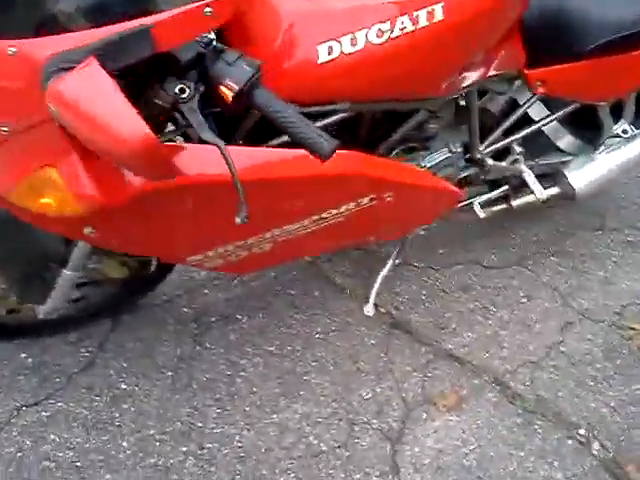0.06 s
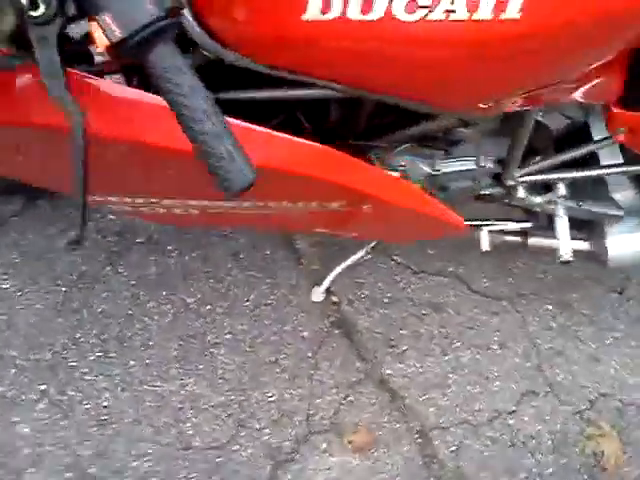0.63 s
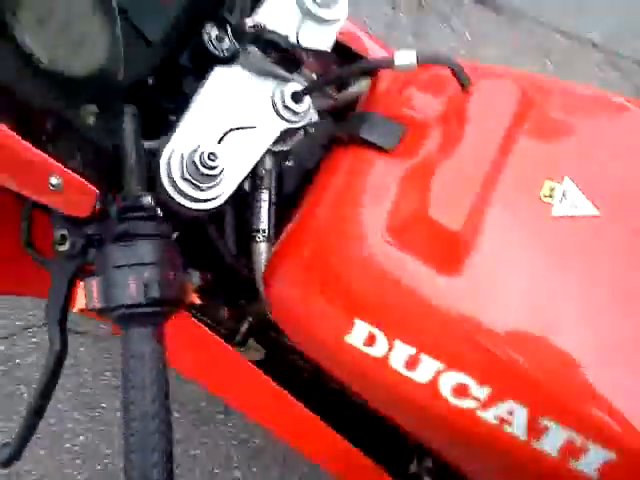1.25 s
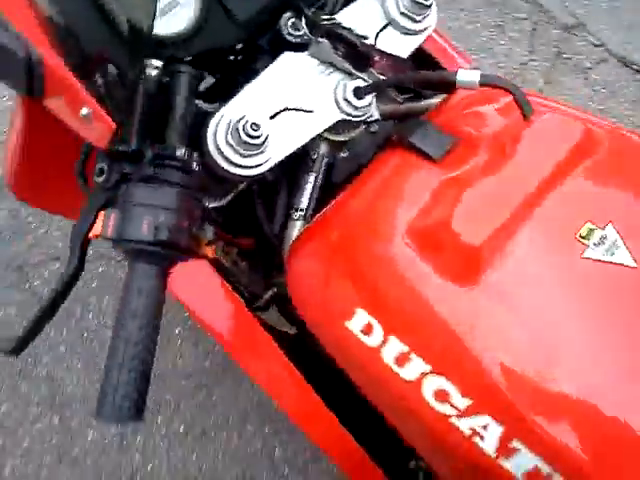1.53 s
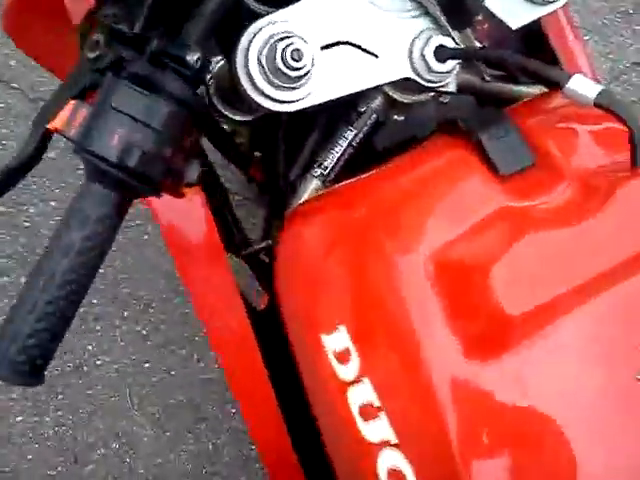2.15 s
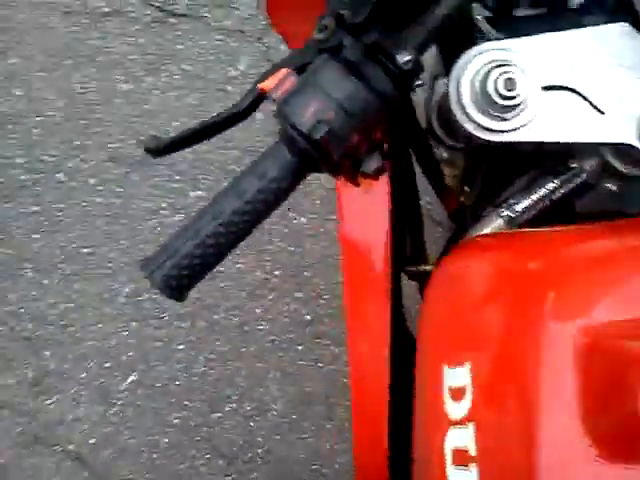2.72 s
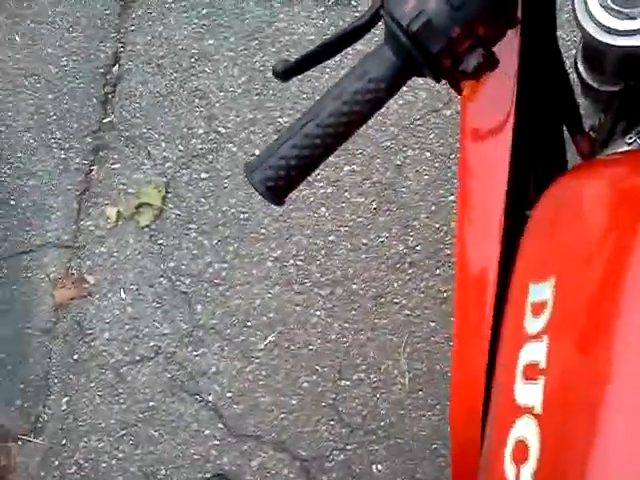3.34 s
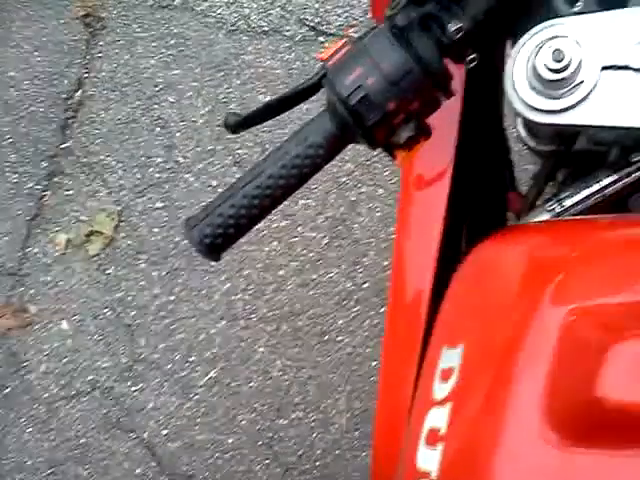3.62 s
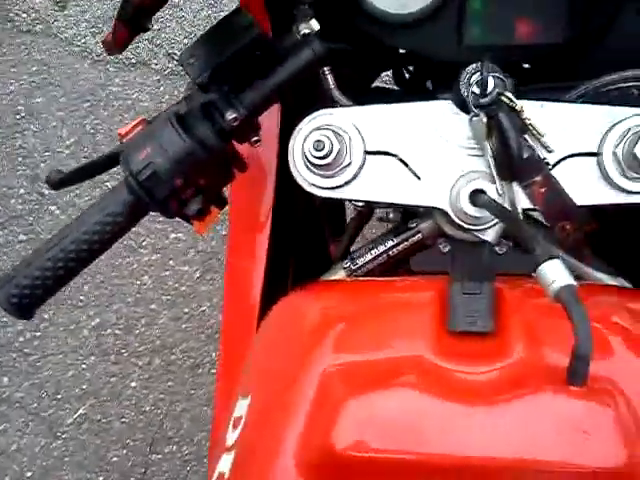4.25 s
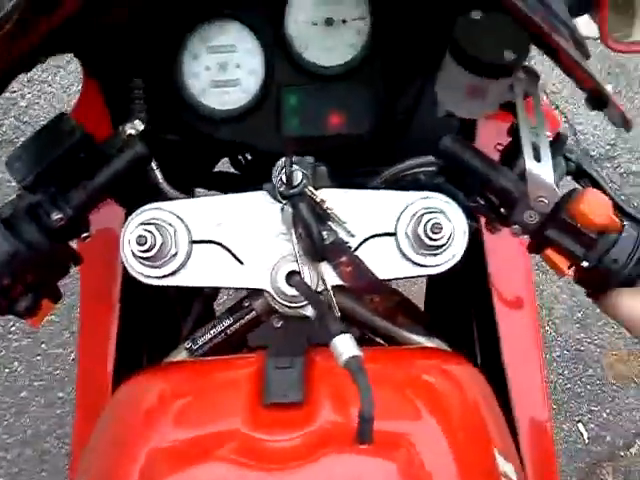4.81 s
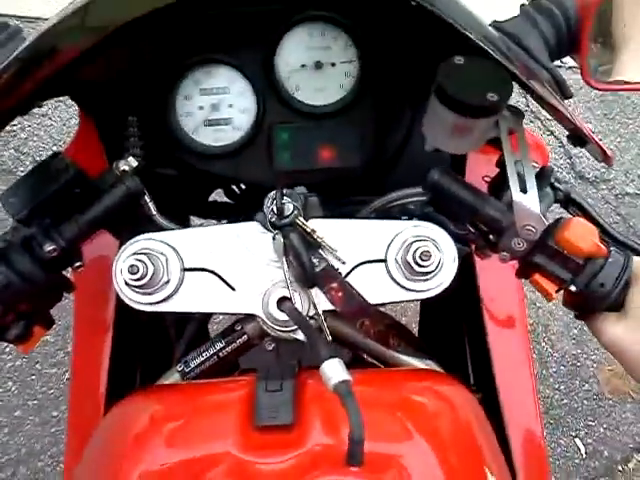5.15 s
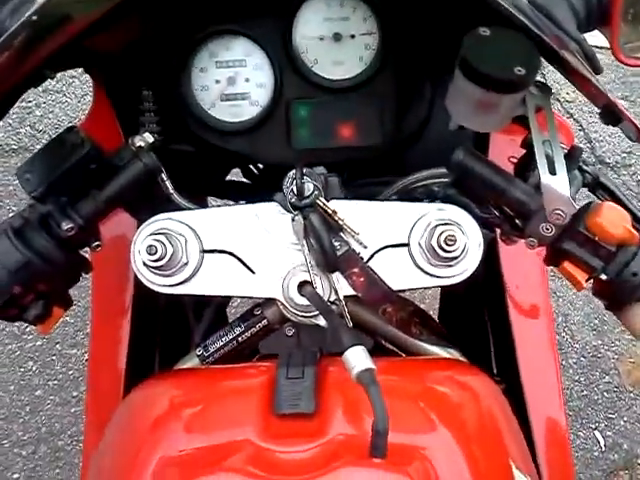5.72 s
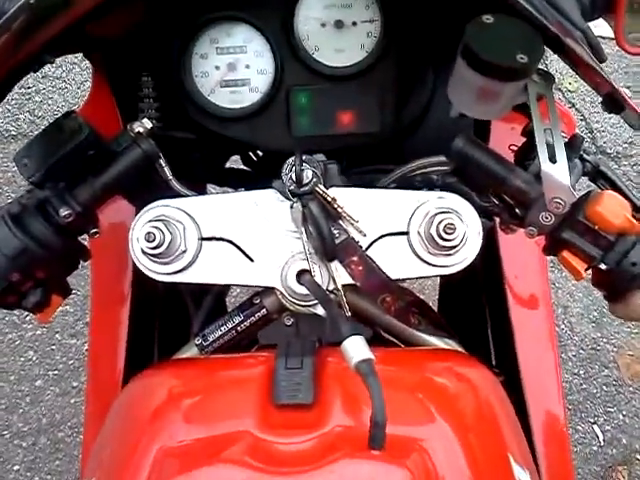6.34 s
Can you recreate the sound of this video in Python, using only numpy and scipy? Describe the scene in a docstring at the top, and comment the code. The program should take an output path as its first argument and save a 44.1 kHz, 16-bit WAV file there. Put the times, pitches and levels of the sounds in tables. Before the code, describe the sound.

Heard close up on a small hand-held microphone outdoors, a motorcycle engine idles unevenly in paired thumps while its clutch and valve gear rattle. The exhaust bark grows a little stronger as the microphone nears the handlebar. Then come two quick revs, a short drop in speed, and two more. Each starts with a crack and opens into a boom, the second and fourth climbing highest, with slight clipping and faint hiss on the peaks.

```python
"""V-twin motorcycle, idle and four blips

Close up in a driveway: a slow, loping double beat, then the throttle is blipped four times.
Every firing barks in the pipes and, under throttle, booms in the airbox; clutch and valve gear clatter
all along. A small hand-held microphone moves from the engine's side to the handlebar.
The loudest revs are flattened and carry a faint high hiss."""
import sys
import numpy as np
from scipy import signal
from scipy.fft import rfft, irfft, next_fast_len
from scipy.io import wavfile
from scipy.ndimage import uniform_filter1d

SR = 44100
rng = np.random.default_rng(int(sys.argv[2]) if len(sys.argv) > 2 else 0)


def output_pcm(signal):
    """Save a mono or channel-first signal as 16-bit PCM at the path in sys.argv[1].

    Samples are clipped to [-1, 1] before scaling.
    """
    pcm = np.clip(np.atleast_2d(signal).T, -1, 1) * 32767
    wavfile.write(sys.argv[1], SR, np.round(pcm).astype(np.int16))


N = 285327
TIME = np.arange(N) / SR
AGE = np.arange(SR // 8) / SR   # seconds since a firing

# exhaust resonances, hollow and upper at idle, open under throttle: (frequency [Hz], level [dB])
PIPE_HOLLOW = [(587, 1.5)]
PIPE_UPPER = [(755, -1), (935, -2.5)]
PIPE_OPEN = [(578, -2), (775, -1.5), (950, -12)]
# airbox resonances: (frequency [Hz], level [dB])
AIRBOX_MODES = [(294.2, -1), (378.7, -13), (260, -21)]
# ringing of the covers and fins, and of the clutch plates: (frequency [Hz], level [dB], t60 [s])
COVER_MODES = [(885, -6, 0.01), (1003, -12, 0.13), (1122, -6, 0.055), (1305, -3, 0.046),
               (1580, -5.5, 0.077), (1810, -7.5, 0.03), (2080, -9.5, 0.04), (2239, -1.5, 0.044),
               (2596, -4, 0.03), (2742, -8.5, 0.013), (3270, -12.5, 0.024)]
PLATE_MODES = [(3285, 3, 0.04), (3370, 1.5, 0.045), (3540, -5.5, 0.047), (2194, -11, 0.03)]
# noise of gas, rattling metal and the hiss on the loudest peaks: (frequency [Hz], relative density [dB])
PUFF_SPECTRUM = [(20, -35), (45, -25), (70, -16.5), (120, -13), (180, -10), (250, -2), (320, -0.5),
                 (420, 0), (520, -6), (700, -25.5), (1200, -60.5)]
RASP_SPECTRUM = [(300, -28), (450, -9), (590, 1), (670, 0), (770, 0), (950, -7), (1300, -20), (2000, -15),
                 (4500, -45)]
CASING_SPECTRUM = [(400, -17), (800, -1.5), (1100, 3.5), (1500, -2.5), (2000, -9), (2800, -23.5),
                   (4500, -38)]
CLUTCH_SPECTRUM = [(1000, -17), (1700, -1), (2200, 2.5), (2900, 4), (3400, -2), (3650, -5), (3950, -16.5),
                   (4600, -15), (5200, -32.5)]
SIZZLE_SPECTRUM = [(3000, -14.5), (5000, 3), (11000, -6.5)]
# the hunting idle, the blips and the brief idle between them: (time [s], speed [four-stroke cycles/s])
IDLE_SPEED = [(0.047, 6.95), (0.71, 7.49), (1.09, 6.67), (1.47, 7.38), (1.61, 6.53), (2.29, 8.15),
              (2.44, 6.32), (2.59, 7.98), (3.44, 6.64)]
BLIP_1 = [(3.47, 14.3), (3.601, 17.1), (3.751, 14.5), (3.879, 15.49), (3.99, 14.2)]
BLIP_2 = [(4.025, 10.97), (4.15, 19.1), (4.299, 26), (4.42, 24.8), (4.551, 15.26), (4.751, 14.6)]
SETTLING_SPEED = [(4.77, 9.6), (4.93, 9.0), (5.06, 7.1), (5.15, 9.8), (5.21, 14), (5.26, 12)]
BLIP_3 = [(5.307, 18.7), (5.42, 20.5), (5.522, 22.8), (5.649, 20.3), (5.779, 17.16), (5.9, 17.8)]
BLIP_4 = [(5.922, 18.3), (6.08, 18.8), (6.22, 29.5), (6.35, 27.5), (6.47, 21)]
# twists of the grip: (opens [s], closes [s], opening [0-1])
TWISTS = [(3.366, 3.536, 0.89), (3.997, 4.165, 0.95), (5.186, 5.444, 0.9), (5.915, 6.089, 1)]
# the first full charge of each blip hits hard: (time [s], level [dB])
KICKS = [(3.47, -10.5), (4.025, -5), (5.266, -7.5), (5.922, -9.5)]
# base levels as the microphone moves from the engine's side to the handlebar: (time [s], bark [dB],
# hollow ring against the bark [dB], thump [dB], casing [dB], clutch [dB], clutch plates [dB])
AT_MICROPHONE = [(0, -16.5, -7, -25.5, -20, -23.5, -28.5), (0.62, -17, 0, -25.5, -20, -21, -32),
                 (1.04, -16.5, 0, -21, -20.5, -20, -28), (1.17, -12.5, 3, -21.5, -24, -18, -23.5),
                 (1.6, -12.5, 0.5, -19, -22, -25, -38), (2.2, -9.5, 0.5, -21, -22.5, -28, -34.5),
                 (2.85, -11, 0.5, -22, -21.5, -28, -35), (3.35, -10.5, -2, -21.5, -20.5, -27, -32),
                 (4.8, -13, -2.5, -21, -23.5, -27, -34), (5.85, -11, -8.5, -24.5, -23, -31, -30),
                 (6.47, -14, 0, -22, -22.5, -27, -32.5)]
# upper pipe resonances against the bark, growing along that move: (time [s], level [dB])
UPPER_AT_MICROPHONE = [(1.2, -23), (2.2, -11.5), (2.7, -5.5), (5.3, -5.5)]

IDLE_PER_S, REVVING_PER_S = 7.44, 19.2   # typical cycles per s
# gap within a pair of firings, in cycles: at idle the first hurries the crank on to the second
IDLE_PAIR_SHARE, REVVING_PAIR_SHARE = 0.28, 270 / 720
THROTTLE_ATTACK_S, THROTTLE_RELEASE_S, AIRFLOW_RELEASE_S = 0.05, 0.048, 0.17   # air outlasts the twist
SECOND_BARK_DB, UNEVEN_DB = 0.6, 0.25   # the second cylinder barks louder; no two charges burn alike
PICKUP_BARK_DB, PICKUP_THUMP_DB = 3, 10   # lift of the slow firings at full throttle
DRAW_FROM_PER_S, DRAW_FULL_PER_S = 14.9, 19.8   # speed alone pulls air through the airbox
BOOM_DB, BOOM_AIRFLOW_DB = -24.5, 13   # airbox base level while revving, and its rise with airflow
COAST_BARK_DB, OPEN_BARK_DB = -19.5, -15   # exhaust base level while revving: throttle shut, wide open
COAST_FADE_DB = 0.22   # per cycle per s: the faster it coasts, the weaker it fires
CASING_DB_PER_OCTAVE, CLUTCH_DB_PER_OCTAVE, PLATES_DB_PER_OCTAVE = 3.5, 6.5, 2   # rise with speed
CASING_THROTTLE_DB = 5.5   # the casing also rattles harder under load
LULL_S, LULL_WIDTH_S, LULL_DB = 5.08, 0.1, -9.5   # the rattles die down as the revs bottom out
BAND_LIMIT_HZ, FIZZ_HZ, CUTOFF_HZ = 4800, 11200, 16000
SIZZLE_DB = -16   # faint high hiss on the loudest peaks, relative to what is clipped off


def idle(times, cylinder):
    """Pairs of hollow barks, each with a puff of gas; a short, sharp intake gulp leads every pair."""
    bark_db, hollow_db, thump_db = read(AT_MICROPHONE, times)[:3]
    upper_db, = read(UPPER_AT_MICROPHONE, times)
    load = throttle(times, THROTTLE_RELEASE_S)
    charge_db = -UNEVEN_DB * rng.standard_normal(len(times))
    bark_db += charge_db + PICKUP_BARK_DB * load + SECOND_BARK_DB * cylinder
    thump_db += charge_db + PICKUP_THUMP_DB * load
    flow = gas_flow(rise_s=0.0034, open_s=0.019, tail_db=-3, tail_s=0.083)
    bark = resound(times, bark_db + hollow_db, PIPE_HOLLOW, flow, detune=0.017, scatter_db=1)
    bark += resound(times, bark_db + upper_db, PIPE_UPPER, flow, detune=0.035, scatter_db=1.5)
    intake = gas_flow(0.002, 0.045, -8, 0.016)
    boom = resound(times, thump_db - 3, AIRBOX_MODES, intake, detune=0.044, scatter_db=2)
    gulp_times, gulp_db = times[cylinder == 0] - 0.0135, bark_db[cylinder == 0] - 5.5
    gulp_flow = gas_flow(0.0005, 0.007, -16, 0.008)
    gulp = resound(gulp_times, gulp_db, PIPE_HOLLOW, gulp_flow, detune=0.11, scatter_db=0.7)
    rush = gusts(times, bark_db - 6, gas_flow(0.0035, 0.021, -1.1, 0.13))
    rush += gusts(gulp_times, gulp_db - 0.5, gulp_flow)
    rasp = patchy(noise(RASP_SPECTRUM), depth_db=3.5) * rush
    puff_flow = gas_flow(0.0074, 0.046, -1, 0.071, close_s=0.12)
    puff = noise(PUFF_SPECTRUM) * gusts(times - 0.006, thump_db - 1.5, puff_flow)
    return bark + boom + gulp + rasp + puff


def blips(times):
    """Under throttle the airbox booms and the pipes roar; as the speed sinks the hollow bark returns."""
    speed, load = engine_speed(times), throttle(times, THROTTLE_RELEASE_S)
    draw = np.clip((speed - DRAW_FROM_PER_S) / (DRAW_FULL_PER_S - DRAW_FROM_PER_S), 0, 1)
    airflow = np.maximum(draw, throttle(times, AIRFLOW_RELEASE_S))
    coast_db = COAST_BARK_DB - COAST_FADE_DB * (speed - REVVING_PER_S)
    crowding_db = 10 * np.log10(speed / REVVING_PER_S)   # faster firings share the same power
    thump_db = BOOM_DB + BOOM_AIRFLOW_DB * airflow - crowding_db
    bark_db = load * OPEN_BARK_DB + (1 - load) * coast_db - crowding_db
    roar_mix = np.clip((speed - 7) / 10, 0.02, 0.85)
    roar_db = bark_db + 10 * np.log10(roar_mix) + 2
    hollow_db = bark_db + 10 * np.log10(1 - roar_mix) - 7
    intake = gas_flow(0.0015, 0.012, -3.5, 0.04)
    boom = resound(times, thump_db + 6, AIRBOX_MODES, intake, detune=0.035, scatter_db=1.5)
    exhaust = gas_flow(0.0011, 0.015, 17, 0.055)
    roar = resound(times, roar_db, PIPE_OPEN, exhaust, detune=0.031, scatter_db=1.5)
    bark = resound(times, hollow_db, PIPE_HOLLOW, exhaust, detune=0.0096, scatter_db=3.5)
    rush = gusts(times, bark_db + 2, gas_flow(0.0025, 0.0053, 0, 0.073))
    rasp = patchy(noise(RASP_SPECTRUM), depth_db=1.5) * rush
    puff = noise(PUFF_SPECTRUM) * gusts(times, thump_db - 5.5, gas_flow(0.0044, 0.011, 13, 0.09))
    return boom + roar + bark + rasp + puff


def kicks():
    """A sudden full charge cracks out of the open pipes."""
    times, db = np.transpose(KICKS)
    flow = gas_flow(rise_s=0.0012, open_s=0.017, tail_db=-7, tail_s=0.012)
    crack = resound(times, db, PIPE_OPEN, flow, detune=0.043, scatter_db=5)
    return crack + noise(RASP_SPECTRUM) * gusts(times, db - 8.5, flow)


def crank_firings(speed_curves, pair_share):
    """Firing times and the cylinder of each (0, 1); the second follows by a share of the cycle."""
    times, cylinders = [], []
    for curve in speed_curves:
        span = TIME[(TIME >= curve[0][0]) & (TIME <= curve[-1][0])]
        cycles = np.cumsum(read(curve, span)[0]) / SR
        fires_at = (np.arange(int(cycles[-1]) + 1)[:, None] + [0, pair_share]).ravel()
        fires_at = fires_at[fires_at < cycles[-1]]
        times.append(np.interp(fires_at, cycles, span))
        cylinders.append(np.arange(len(fires_at)) % 2)
    return np.concatenate(times), np.concatenate(cylinders)


def engine_speed(times):
    """Four-stroke cycles per second, through idle and blips."""
    return read(np.vstack([IDLE_SPEED, BLIP_1, BLIP_2, SETTLING_SPEED, BLIP_3, BLIP_4]), times)[0]


def throttle(times, release_s):
    """Opening 0-1: each twist rises quickly, is held and dies away."""
    opens, closes, depth = np.transpose(TWISTS)[:, :, None]
    rise = np.clip((times - opens) / THROTTLE_ATTACK_S, 0, 1)
    fall = np.exp(-(np.maximum(times - closes, 0) / release_s) ** 2)
    return np.max(depth * rise * fall, axis=0)


def gas_flow(rise_s, open_s, tail_db, tail_s, close_s=0.095):
    """One firing: the valve opens, the cylinder blows down, the flow ebbs until the valve shuts."""
    blowdown = np.exp(-(AGE / open_s) ** 4) + from_db(tail_db) * np.exp(-AGE / tail_s)
    flow = blowdown * (1 - np.exp(-AGE / rise_s)) * np.exp(-(AGE / close_s) ** 6)
    return flow / flow.max()


def resound(times, db, modes, flow, detune, scatter_db):
    """Each firing drives the resonances; gas heat and charge vary their pitch and strength."""
    shapes = 0
    for hz, mode_db in modes:
        pitch, strength = rng.standard_normal((256, 2))[:len(times)].T
        wave = np.sin(2 * np.pi * hz * np.outer(1 + detune * pitch, AGE))
        shapes += wave * from_db(db + mode_db + scatter_db * strength)[:, None]
    return lay_out(times, shapes * flow)


def gusts(times, db, flow):
    """Envelope of the turbulence: the firings add in power."""
    return np.sqrt(lay_out(times, np.outer(from_db(db), flow) ** 2))


def machinery(times):
    """Gears, valves and loose clutch plates rattle, hardest as each firing jerks the crank."""
    casing_db, clutch_db, plates_db = rattle_levels(TIME)
    casing_jerk, clutch_jerk = jerks(times, steady_db=-13), jerks(times, steady_db=-2)
    contacts = rms_one(knocks(per_s=700, spread_db=2.5))
    casing = coloured(contacts + 1.13 * rng.standard_normal(N), CASING_SPECTRUM)
    casing = patchy(casing, depth_db=5) * from_db(casing_db - 3)
    clutch = coloured(contacts + 1.54 * rng.standard_normal(N), CLUTCH_SPECTRUM)
    clutch = patchy(clutch, depth_db=3.5) * from_db(clutch_db - 3)
    taps = knocks(per_s=220, spread_db=2)
    plates = sum(from_db(db) * ring(taps, hz, t60) for hz, db, t60 in PLATE_MODES)
    plates = rms_one(plates) * from_db(plates_db)
    return casing_jerk * casing + clutch_jerk * clutch + np.sqrt(clutch_jerk) * plates


def valve_knocks(times, scatter_db=3, late_s=0.012):
    """A metal knock follows each firing and rings every cover mode with a strength of its own."""
    casing_db, clutch_db, _ = rattle_levels(times)
    knock_db = (casing_db + clutch_db) / 2 - 2
    delay = rng.random(256)[:len(times)] * late_s
    at = np.clip((times + delay) * SR, 0, N - 1).astype(int)
    covers = 0
    for hz, db, t60 in COVER_MODES:
        strength, sign = rng.standard_normal((256, 2))[:len(times)].T
        clicks = np.zeros(N)
        clicks[at] = np.sign(sign) * from_db(knock_db + db + scatter_db * np.minimum(strength, 1))
        covers += ring(clicks, hz, t60)
    return covers


def rattle_levels(times):
    """Casing, clutch and plate levels in dB, from the microphone's place, the speed and the throttle."""
    casing_db, clutch_db, plates_db = read(AT_MICROPHONE, times)[3:]
    octaves = np.log2(engine_speed(times) / IDLE_PER_S)
    lull_db = LULL_DB * np.exp(-((times - LULL_S) / LULL_WIDTH_S) ** 2)
    load_db = CASING_THROTTLE_DB * throttle(times, AIRFLOW_RELEASE_S)
    return (casing_db + CASING_DB_PER_OCTAVE * octaves + load_db + lull_db,
            clutch_db + CLUTCH_DB_PER_OCTAVE * octaves + lull_db,
            plates_db + PLATES_DB_PER_OCTAVE * octaves + lull_db / 2)


def jerks(times, steady_db):
    """A swell with every firing over a steady rattle, evened out across one idle cycle."""
    swells = gusts(times, np.zeros(len(times)), gas_flow(0.0023, 0.04, 3.6, 0.073))
    power = swells ** 2 + from_db(steady_db)
    return np.sqrt(power / uniform_filter1d(power, int(SR / IDLE_PER_S)))


def knocks(per_s, spread_db):
    """Random metal contacts of uneven force."""
    chance, size, sign = rng.random((3, N))
    force = from_db(spread_db * np.minimum(-np.log(1 - size), 3.5))
    return (chance < per_s / SR) * force * np.sign(sign - 0.5)


def rumble():
    """The steady low rumble the engine leaves in the driveway."""
    return from_db(-30) * noise(PUFF_SPECTRUM) + from_db(-34) * noise(RASP_SPECTRUM)


def patchy(x, depth_db, per_s=70):
    """Every third of an octave swells and fades by itself, as turbulence and rattles do."""
    size = next_fast_len(N + 4096)
    band = 3 * np.log2(np.clip(np.fft.rfftfreq(size, 1 / SR), 500, 4000) / 500)
    spectrum, out = rfft(x, size), 0
    for k in range(10):
        swell = from_db(depth_db * rng.standard_normal(2048))
        gain = np.interp(TIME * per_s, np.arange(len(swell)), swell)
        out += gain * irfft(spectrum * np.maximum(1 - abs(band - k), 0), size)[:N]
    return rms_one(out)


def noise(spectrum):
    """Steady noise with a spectrum; rms 1."""
    return coloured(rng.standard_normal(N), spectrum)


def coloured(x, spectrum):
    """Filter x by a spectrum; rms 1."""
    hz, db = np.transpose(spectrum)
    size = next_fast_len(N + 4096)
    bins_hz = np.maximum(np.fft.rfftfreq(size, 1 / SR), 1)
    gain = from_db(np.interp(np.log(bins_hz), np.log(hz), db))
    return rms_one(irfft(rfft(x, size) * gain, size)[:N])


def ring(clicks, hz, t60):
    """Each click sets a decaying sine ringing."""
    decay, angle = from_db(-60 / (t60 * SR)), 2 * np.pi * hz / SR
    return signal.lfilter([0, np.sin(angle)], [1, -2 * decay * np.cos(angle), decay ** 2], clicks + 1e-18)


def lay_out(times, shapes):
    """Sum one short shape per event along the time axis."""
    out = np.zeros(N + shapes.shape[1])
    for at, shape in zip(np.clip(times * SR, 0, N).astype(int), shapes):
        out[at:at + len(shape)] += shape
    return out[:N]


def read(rows, times):
    """Columns of a curve table at the given times."""
    row_times, *columns = np.transpose(rows)
    return [np.interp(times, row_times, column) for column in columns]


def low_pass(x, hz):
    """Steep cut above hz."""
    return signal.fftconvolve(x, signal.firwin(401, hz, fs=SR)[None], "same")


def saturate(x, ceiling, order):
    """Flatten peaks at the ceiling; a higher order gives a harder knee."""
    return x / (1 + (x / ceiling) ** order) ** (1 / order)


def from_db(db):
    return 10 ** (np.asarray(db) / 20)


def rms_one(x):
    return x / np.sqrt(np.mean(x ** 2) + 1e-20)


def scene():
    """The engine close up, in mono, with the driveway's rumble behind it."""
    idling, cylinder = crank_firings([IDLE_SPEED, SETTLING_SPEED], IDLE_PAIR_SHARE)
    revving, _ = crank_firings([BLIP_1, BLIP_2, BLIP_3, BLIP_4], REVVING_PAIR_SHARE)
    firings = np.concatenate([idling, revving])
    combustion = idle(idling, cylinder) + blips(revving) + kicks()
    clatter = machinery(firings) + valve_knocks(firings)
    return (combustion + clatter + rumble())[None]


def record(dry):
    """Loud peaks are flattened, the sound is cut above 4.8 kHz, and clipped peaks fizz."""
    rounded = saturate(from_db(2.5) * dry, ceiling=1.262, order=4)
    low_cut = signal.butter(1, 32, "high", fs=SR, output="sos")
    narrow = low_pass(signal.sosfilt(low_cut, rounded), BAND_LIMIT_HZ)
    clipped = saturate(narrow, ceiling=1.0, order=30)
    overshoot = np.sqrt(np.abs(uniform_filter1d((narrow - clipped) ** 2, size=600)))
    sizzling = clipped + from_db(SIZZLE_DB) * overshoot * noise(SIZZLE_SPECTRUM)
    body = low_pass(sizzling, FIZZ_HZ)
    fizz = from_db(-11) * (sizzling - body)
    return low_pass(body + fizz, CUTOFF_HZ)


dry = scene()
out = record(dry)
output_pcm(out)
```